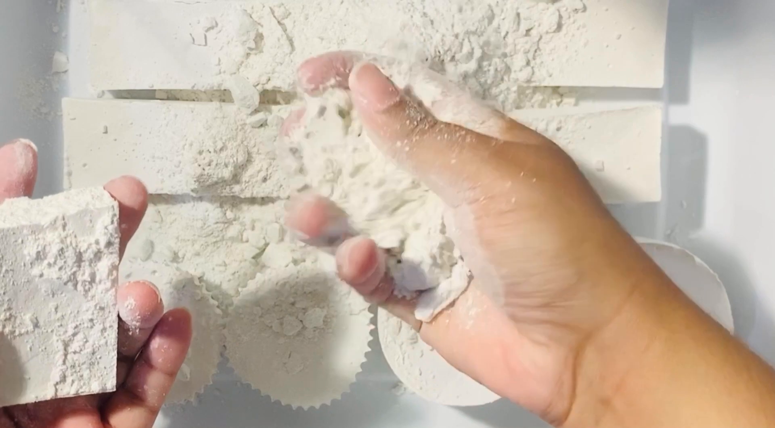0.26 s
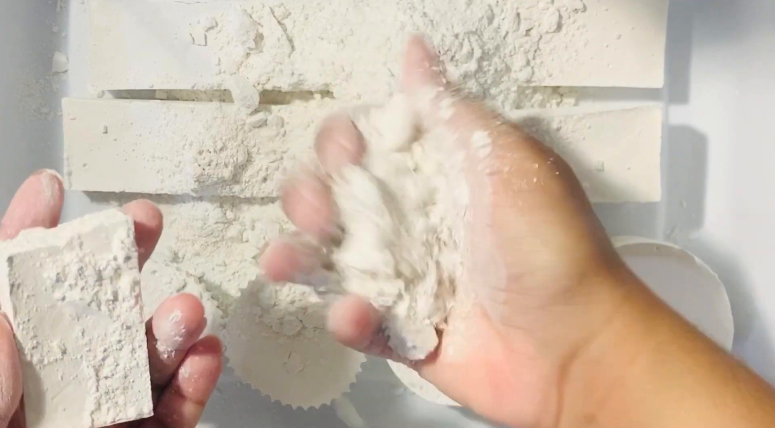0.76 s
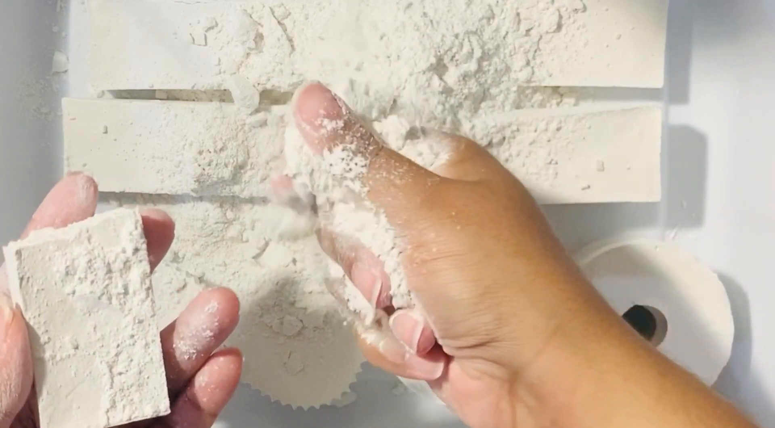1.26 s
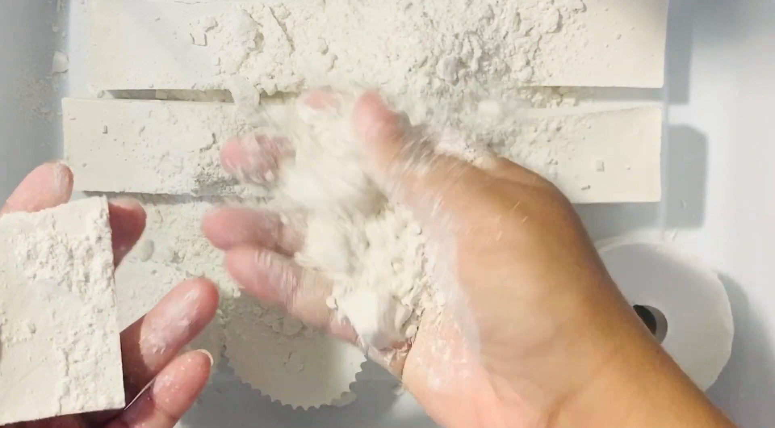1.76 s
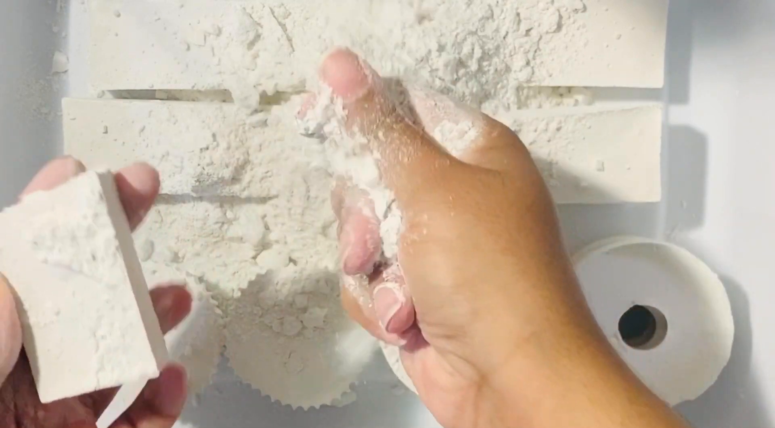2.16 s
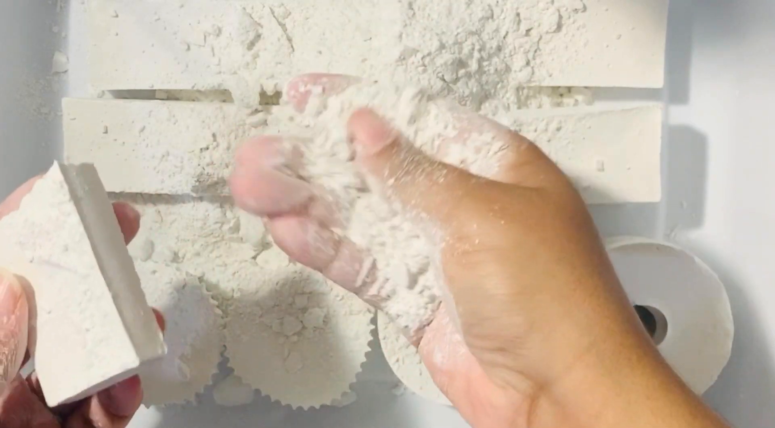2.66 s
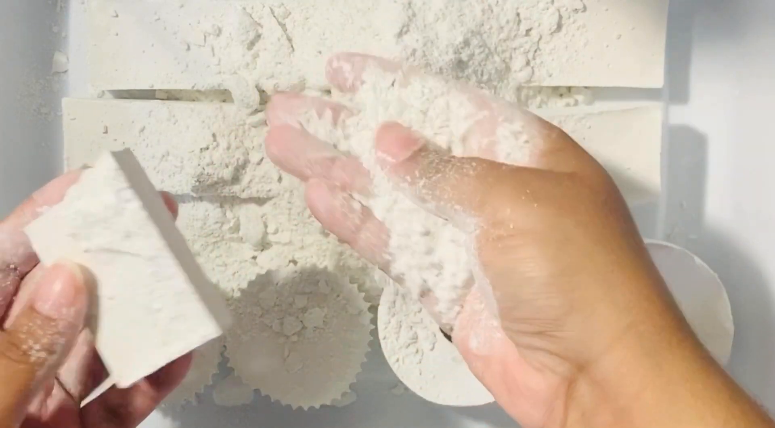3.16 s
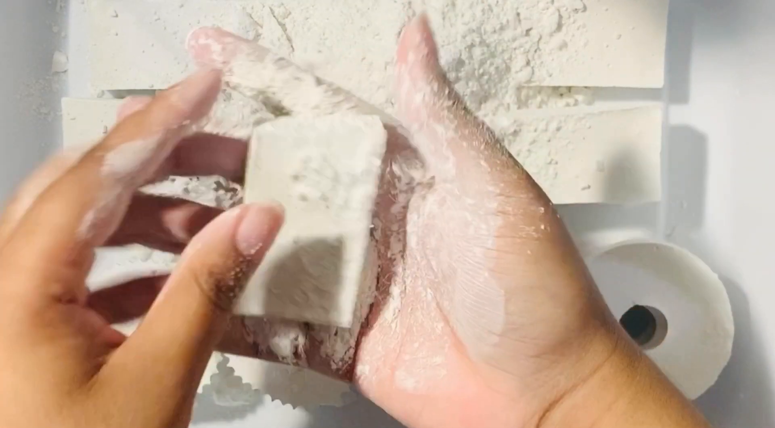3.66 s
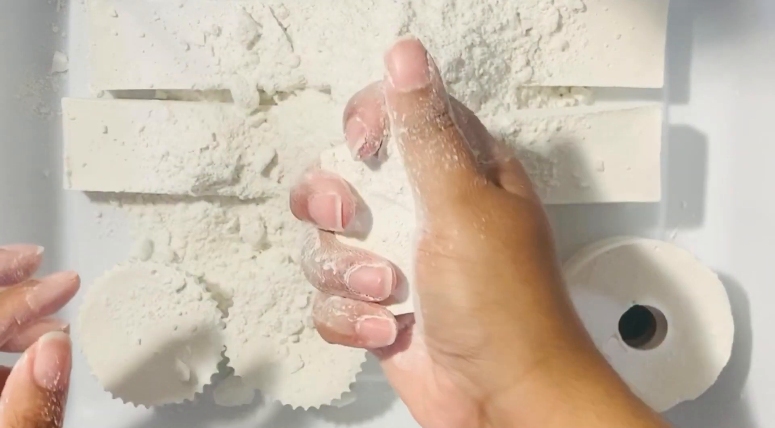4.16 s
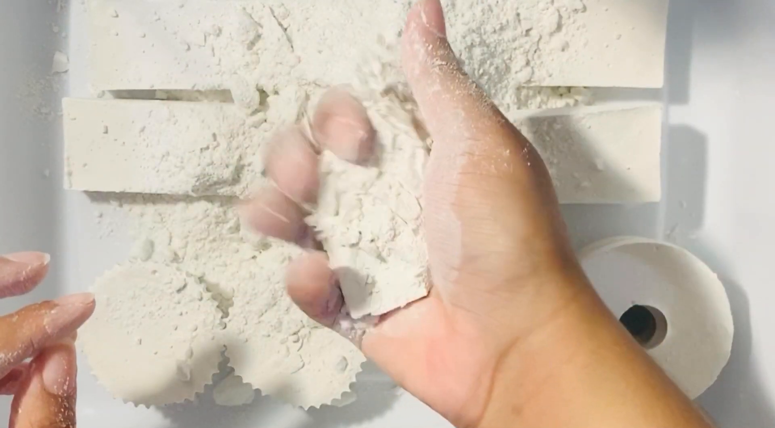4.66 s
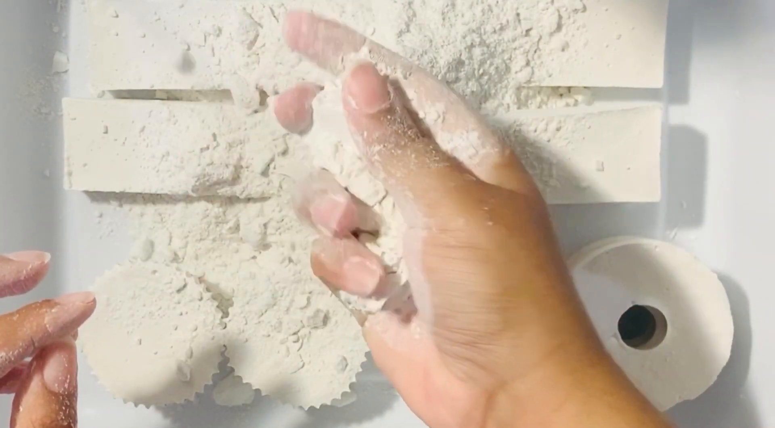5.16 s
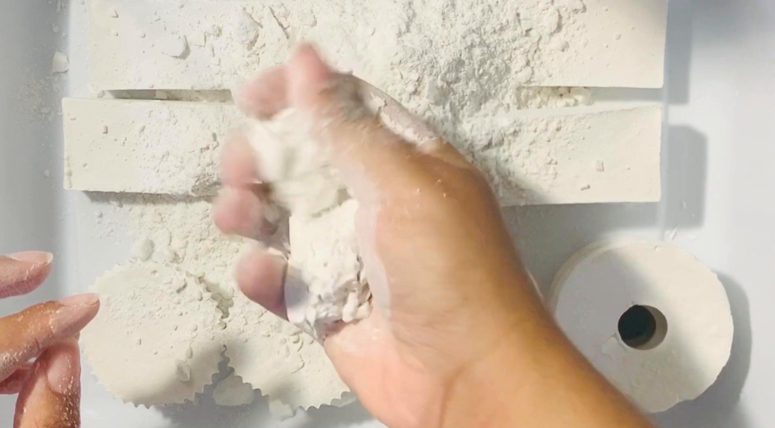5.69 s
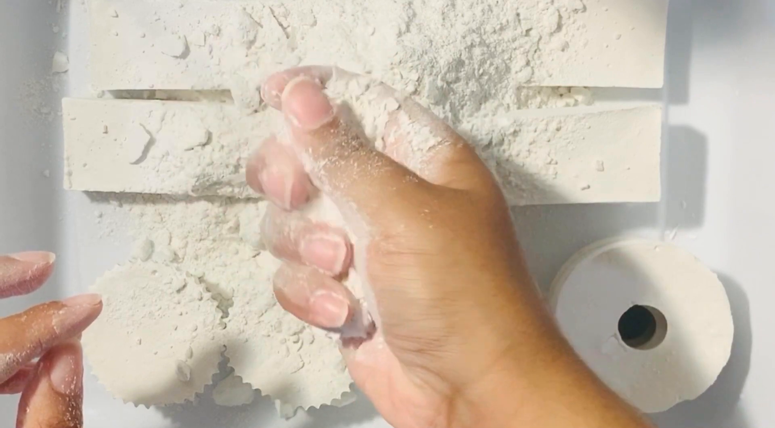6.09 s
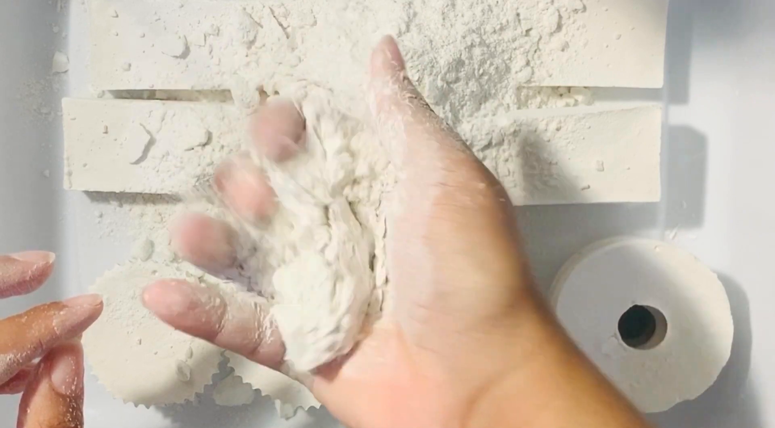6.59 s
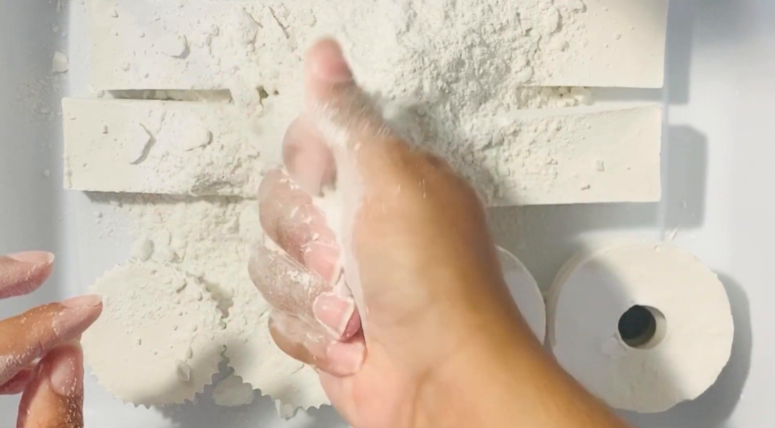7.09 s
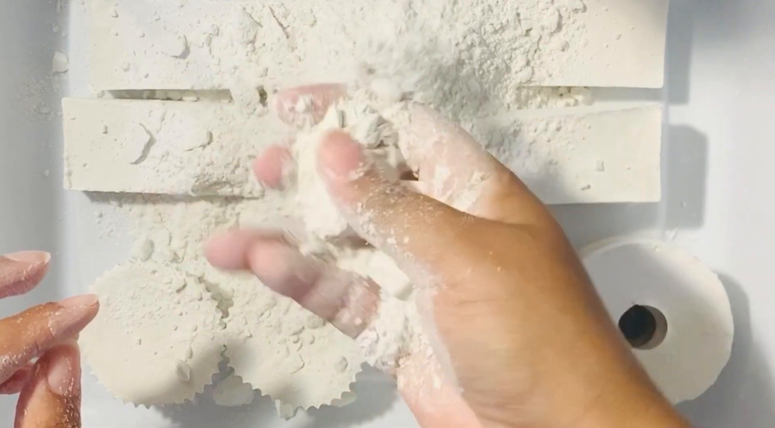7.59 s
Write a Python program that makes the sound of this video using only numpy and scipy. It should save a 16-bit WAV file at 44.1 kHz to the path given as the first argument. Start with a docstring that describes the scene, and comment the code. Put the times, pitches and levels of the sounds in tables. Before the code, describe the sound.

Very close to the microphone in a small quiet room, a fist squeezes soft chalk. High powdery hiss swells with each finger stroke over gritty grinding and small dry snaps. Falling lumps clack on a tray early on, with a heavier cluster just after two seconds. A fresh block then gives way with a short low thump, followed by softer crunching, one late sharp knock and more rustle, over faint rumble and hum.

```python
"""First a soft hiss of powder between the fingers, over a low rumble and a faint mains hum. A hand
crushes soft chalk over a tray, close to the microphone, in a small quiet room. The hiss, grinding crumbs
and dull bumps are noise that swells; the hum and one thump are sine waves. Snaps are bursts of noise, and
knocks are fading tones with a crushing burst. Both have set strengths in five bands and a faint echo."""
import sys
import numpy as np
from scipy import signal
from scipy.fft import rfft, irfft, next_fast_len
from scipy.io import wavfile
from scipy.ndimage import map_coordinates

SR = 44100
rng = np.random.default_rng(int(sys.argv[2]) if len(sys.argv) > 2 else 0)


def int16_out(signal):
    """Quantize to a 16-bit WAV file."""
    q = np.round(np.clip(np.atleast_2d(signal).T, -1, 1) * 32767)
    wavfile.write(sys.argv[1], SR, q.astype(np.int16))


N = 345744  # length of the scene in samples
HIT_TIME = np.arange(4096) / SR  # clock of one short hit, in seconds


def amp(db):
    """Turn decibels into a gain."""
    return 10 ** (np.asarray(db) / 20)


def unit(x):
    """Scale a sound to rms 1."""
    return x / np.sqrt(np.mean(x ** 2) + 1e-20)


def along(points, hz):
    """Read a curve of (frequency, value) points on a log frequency axis."""
    f, v = np.transpose(points)
    return np.interp(np.log(hz + 1), np.log(f + 1), v)


def wobble(rate):
    """Draw a smooth random curve with this many random points a second."""
    points = rng.standard_normal(int(N * rate / SR) + 4)
    return map_coordinates(points, [np.arange(N) * rate / SR])


def filtered(x, response):
    """Multiply the spectrum of x by a response that depends on frequency."""
    size = next_fast_len(N + SR // 2)
    hz = np.fft.rfftfreq(size, 1 / SR)
    return irfft(rfft(x, size) * response(hz), size)[:N]


def coloured(x, spectrum):
    """Give x a spectrum, at rms 1."""
    return unit(filtered(x, lambda hz: amp(along(spectrum, hz))))


def fade(t60):
    """Die away over one hit, falling 60 dB in t60 seconds."""
    return np.exp(-np.log(1000) * HIT_TIME / max(t60, 1e-3))


def rise(seconds):
    """Build up the contact over a short time."""
    return 1 - np.exp(-(HIT_TIME / seconds) ** 2)


def add(track, s, sound):
    """Mix a sound into a track at time s."""
    part = track[max(round(s * SR), 0):][:len(sound)]
    part += sound[:len(part)]


def swells(gestures, rest_db=-120):
    """Let each gesture grow and shrink in a bell; their powers add over a resting level."""
    t = np.arange(N) / SR
    coarse = t[::32]  # slow curves need few points
    bells = (amp(db) ** 2 * np.exp(-(2 * (coarse - s) / seconds) ** 2) for s, db, seconds in gestures)
    power = sum(bells)
    return np.interp(t, coarse, np.sqrt(power + amp(rest_db) ** 2))


def burst(spectrum, envelope):
    """Make a short rush of coloured noise under an envelope."""
    hz = np.fft.rfftfreq(len(HIT_TIME), 1 / SR)
    noise = rfft(rng.standard_normal(len(HIT_TIME)))
    return unit(irfft(noise * amp(along(spectrum, hz)))) * envelope


def grains(rate, spread_db, life):
    """Scatter tiny noisy cracks at random times, rate a second, of very unequal size."""
    starts = rng.random(N) < rate / SR
    sizes = starts * amp(spread_db * np.clip(rng.standard_normal(N), -2, 2))
    power = np.abs(signal.fftconvolve(sizes ** 2, fade(life) ** 2)[:N])
    return unit(np.sqrt(power) * rng.standard_normal(N))


def band_levels(colour, level_db, bright_db, thud_db):
    """List a hit's five band levels: hardness tilts the upper four, and the thud lies below."""
    offset_db, share = np.transpose(colour)
    return np.r_[thud_db, level_db + offset_db + share * bright_db]


# the thud, body, clack, edge and dust bands of a hit: (from [Hz], to [Hz])
HIT_BANDS = [(80, 450), (450, 1100), (1100, 2200), (2200, 4500), (4500, 16000)]
# a point inside each of these bands: frequency [Hz]
BAND_CENTRES = [260, 780, 1520, 3100, 8000]


def voiced(hit, levels_db, count=3):
    """Set a hit's band strengths by a smooth causal colour: hard contacts are bright, soft ones dull."""
    size = len(HIT_TIME)
    hz, z = np.fft.rfftfreq(size, 1 / SR), rfft(hit)
    for _ in range(count):  # each pass comes closer to the wanted levels
        energy = [np.sum(abs(z[(hz >= lo) & (hz < hi)]) ** 2) for lo, hi in HIT_BANDS]
        rms = np.sqrt(np.array(energy) * 2 / size / (SR * .01))  # as if spread over 10 ms
        cepstrum = irfft(along(np.c_[BAND_CENTRES, np.log(amp(levels_db) / rms)], hz))
        # folding the cepstrum forward in time keeps sound from leaking ahead of the hit
        cepstrum[1:size // 2] *= 2
        cepstrum[size // 2 + 1:] = 0
        z = z * np.exp(rfft(cepstrum))
    return irfft(z)


# colour of the room rumble and microphone hiss: (frequency [Hz], relative level [dB per Hz])
AIR_SPECTRUM = [(20, -1), (45, -1), (90, -12.5), (200, -15.5), (500, -26), (1200, -21.5), (4000, -23.5),
                (16000, -35)]


def background(air_db=-62, hum_db=-61, early_hum_db=-12, waver_db=2, drift=0.81):
    """Add room rumble, microphone hiss and a wavering mains hum that grows after the first seconds."""
    t = np.arange(N) / SR
    growth_db = np.interp(t, [1.7, 2.6], [early_hum_db, 0])
    level = amp(hum_db + growth_db + waver_db * wobble(12))
    phase = 2 * np.pi * 120 * t  # a 120 Hz hum
    hum = np.sqrt(2) * level * np.sin(phase + drift * wobble(40))
    return hum + amp(air_db) * coloured(rng.standard_normal(N), AIR_SPECTRUM)


# low rumble of the moving hand: (time [s], level before flesh_db [dB])
HAND_RUMBLE = [(0, -58.5), (1.9, -61), (3.6, -58), (7.84, -60)]
# squeezes of the fist that grind the crumbs: (time of the height [s], relative grit level [dB], duration [s])
SQUEEZES = [(.34, -57, .11), (.5, -61, .14), (1.03, -60, .16), (1.36, -60.5, .16), (1.99, -56, .15),
            (2.75, -59, .2), (3.7, -59, .09), (3.99, -60, .07), (4.33, -61, .12), (5.01, -59, .17),
            (5.42, -58, .12), (6.02, -56.5, .06), (6.27, -59.5, .08), (6.75, -57, .12), (7.03, -59.5, .17),
            (7.72, -60, .18)]
# strokes of the fingers over fine powder: (time of the height [s], hiss level [dB], duration [s])
STROKES = [(.01, -55.5, 0.059), (.14, -64, .08), (.47, -58.5, 0.13), (.62, -53.5, 0.083), (.76, -58, 0.057),
           (1.27, -57, 0.034), (1.51, -59.5, 0.088), (1.63, -56, 0.032), (1.97, -60, 0.12),
           (2.22, -56.5, 0.13), (2.44, -56.5, 0.12), (2.68, -57.5, 0.075), (2.82, -56, 0.093),
           (3.06, -54, .09), (3.32, -54.5, 0.11), (3.59, -53, 0.08), (3.81, -57.5, 0.099),
           (4.0, -62.5, .07), (4.42, -65.5, 0.28), (4.59, -60, 0.04), (4.85, -62, 0.14), (5.17, -55, 0.073),
           (5.4, -54.5, .11), (5.63, -56, 0.081), (5.87, -57, 0.063), (6.02, -56.5, .06),
           (6.27, -55.5, 0.17), (6.44, -50.5, 0.052), (7.03, -53, 0.17), (7.59, -64.5, 0.042),
           (7.79, -61.5, .11)]
# the fingers never quite rest: hiss and relative grit level between the gestures [dB]
REST_HISS_DB, REST_GRIT_DB = -65.5, -64.5
# colour of the rumbling flesh: (frequency [Hz], relative level [dB per Hz])
FLESH_SPECTRUM = [(30, -4.5), (60, 1.5), (90, -0.5), (160, -10.5), (250, -7), (450, -20.5), (900, -28.5)]
# colour of the grinding crumbs: (frequency [Hz], relative level [dB per Hz])
CRUMB_SPECTRUM = [(200, -11.5), (420, 4), (600, 6), (740, -4.5), (900, 4), (1100, -8.5), (1400, 0),
                  (1800, -11), (2500, -5.5), (3500, -11.5), (5000, -13), (8000, -16), (16000, -23.5)]
# colour of the sliding powder: (frequency [Hz], relative level [dB per Hz])
POWDER_SPECTRUM = [(3820, -47), (6500, -9), (7460, -11.5), (8060, -4.5), (9390, 0.5), (11000, -1.5),
                   (12000, 1), (14900, 2), (15800, -8)]


def kneading(flesh_db=-1, crumb_db=-3, smear_db=-4, powder_db=0, sparkle_db=-9):
    """Rub the lump: flesh rumbles, crumbs grind, and fine powder slides with a high hiss."""
    rub = amp(np.interp(np.arange(N) / SR, *np.transpose(HAND_RUMBLE)))
    grind = swells(SQUEEZES, REST_GRIT_DB)
    slide = swells(STROKES, REST_HISS_DB)
    uneven_db = 1.8 * wobble(20)
    flesh = coloured(rng.standard_normal(N), FLESH_SPECTRUM) * amp(flesh_db + uneven_db)
    crumbs = amp(crumb_db) * coloured(grains(rate=140, spread_db=4.0, life=0.003), CRUMB_SPECTRUM)
    smear = amp(smear_db) * coloured(rng.standard_normal(N), CRUMB_SPECTRUM)
    sparkle = amp(sparkle_db) * grains(rate=380, spread_db=7, life=.002)
    dust = rng.standard_normal(N) + sparkle
    powder = coloured(dust, POWDER_SPECTRUM) * amp(powder_db + 1.7 * wobble(41))
    return rub * flesh + grind * (crumbs + smear) + slide * powder


# the block slides into the dusty palm in two pushes: (time of the height [s], level [dB], duration [s])
SKIDS = [(3.58, -64, 0.035), (3.82, -61, 0.064)]


def skid(centre_hz=9600, width_hz=700):
    """Rustle faintly, like a sliding block, in a narrow band of noise with an unsteady level."""
    band = lambda hz: 1 / (1 + (2 * (hz - centre_hz) / width_hz) ** 2)
    hiss = unit(filtered(rng.standard_normal(N), band))
    return hiss * swells(SKIDS) * amp(2 * wobble(60))


# fingers bumping and clenching: (time of the height [s], level [dB], duration [s])
BUMPS = [(.19, -55.5, 0.015), (.297, -53, .019), (.634, -44.5, 0.026), (.725, -50, 0.046),
         (.86, -56.5, 0.055), (1.38, -52, .085), (2.134, -39, 0.041), (2.21, -45.5, 0.035),
         (2.307, -39, .059), (2.345, -45.5, 0.051), (6.012, -74, 0.026)]


def bumps(level_db=0):
    """Swell dully with no sharp edge, as soft flesh does."""
    # (frequency [Hz], relative level [dB per Hz])
    dull = [(40, -20.5), (80, 4.5), (130, 1), (200, -6.0), (350, -10), (700, -41.0)]
    return amp(level_db) * swells(BUMPS) * coloured(rng.standard_normal(N), dull)


def thump(s=4.2572, level_db=-19, hz=118, t60=0.031, attack=0.0015):
    """Thump once on a short low tone: the fresh block gives way and the closing fist lands on it."""
    out = np.zeros(N)
    tone = np.sin(2 * np.pi * hz * HIT_TIME)
    add(out, s, amp(level_db) * tone * fade(t60) * rise(attack))
    return out


# hard lumps and shards that ring briefly: (time [s], pitch [Hz], level before shaping [dB], t60 [s])
CHINKS = [(.631, 1970, -41.5, 0.048), (.631, 2910, -45.5, 0.054), (.686, 4020, -62, .04),
          (0.7583, 1360, -14, 0.02), (.7575, 1894, -15, 0.037), (0.7555, 4550, -22.5, 0.013),
          (2.108, 1940, -36, 0.098), (2.109, 2910, -49, .045), (2.133, 4060, -32.5, 0.042),
          (2.2958, 2790, -24.5, 0.013), (3.7046, 1730, -21, 0.013), (3.7039, 2300, -25.5, .016),
          (3.7035, 567, -24.5, 0.023), (3.958, 4010, -46.5, 0.035), (5.496, 4040, -42.5, 0.034),
          (5.6094, 1330, -10, .014), (5.6071, 3410, -7, .012)]


def chinks():
    """Ring dense shards: each row is one bending mode, a sine that fades quickly."""
    out = np.zeros(N)
    for s, hz, db, t60 in CHINKS:
        add(out, s, amp(db) * np.sin(2 * np.pi * hz * HIT_TIME) * fade(t60) * rise(0.00051))
    return out


def crumblings(level_db=-65.5, spread_db=1.4, bright_db=-3, bright_spread_db=5,
               thud_over_level_db=2, t60=.016, count=28):
    """Let small crumbs give way at random, most often while the fist squeezes; rows as in SNAPS."""
    work = np.cumsum(swells(SQUEEZES, REST_GRIT_DB) ** 2)
    chance = rng.standard_normal((count, 2))
    shares = (np.arange(count) + rng.random(count)) / count  # one crumb for each equal share of the work
    times = np.searchsorted(work / work[-1], shares) / SR
    levels = level_db + spread_db * chance[:, 0]
    brights = bright_db + bright_spread_db * chance[:, 1]
    return [(s, db, bright, db + thud_over_level_db, t60) for s, db, bright in zip(times, levels, brights)]


# breaks in the hand: (time [s], level before the colour [dB], brightness before its share [dB],
# thud level [dB], t60 of the fracture [s])
SNAPS = [(0.2544, -62, 2, -64, .019), (.3546, -66, -17, -60, 0.023), (0.377, -69, -21, -55, .025),
         (0.2857, -57.5, -1, -48, 0.062), (.3123, -60.5, -16, -44, 0.047), (0.41, -55, 6, -48.5, .008),
         (.5073, -59.5, 2, -62, .013), (1.2725, -61.5, -6, -51, .028), (1.3424, -55, -4.5, -55, 0.043),
         (1.363, -54, -13.5, -49, .044), (1.3765, -61, -7, -56, 0.034), (1.4026, -52, 0.5, -54, 0.037),
         (1.549, -71, 15.5, -76, .01), (1.863, -65, 6, -59, .031), (1.9252, -54.5, 4, -64, 0.055),
         (1.9618, -55, 3, -56, 0.039), (1.9757, -43, -5.5, -60, 0.0099), (1.9806, -46.5, -12, -47.5, 0.023),
         (2.0051, -44, 3, -51, 0.019), (2.1563, -47.5, 6.5, -50, 0.0081), (2.1765, -51, 3, -59, 0.0079),
         (2.2142, -47.5, -3.5, -61, 0.038), (2.294, -43.5, 6.5, -52.5, .016), (2.373, -63, 1.5, -62, .018),
         (3.4812, -49.5, -3.5, -52, 0.043), (3.4999, -54.5, -6.5, -63, 0.017), (3.6421, -60, 10, -60, .014),
         (3.7166, -53.5, -1.5, -56, 0.051), (3.7666, -62, 14.5, -69, .01), (3.7782, -68, 19.5, -66, 0.0054),
         (4.0237, -55.5, 10, -69, 0.016), (4.2586, -46, 6.5, -40.5, .025), (4.4012, -53.5, 1, -60.5, 0.057),
         (4.951, -62.5, -1.5, -55, .015), (4.99, -63, 5, -54, .016), (5.0767, -50.5, -6.5, -52, 0.032),
         (5.1153, -61, -2.5, -69, .04), (5.4191, -55.5, 7, -52, 0.03), (5.8082, -53, 6.5, -57, .014),
         (5.8149, -46.5, 3.5, -61, 0.03), (5.97, -47.5, 5.5, -46, 0.022), (6.0058, -47.5, 2.5, -44, 0.044),
         (6.05, -54.5, -2, -65, 0.015), (6.2659, -53.5, -4, -49, 0.021), (6.292, -45, -1.5, -56.5, 0.012),
         (6.7292, -50.5, -4.5, -49, 0.022), (6.9468, -58.5, 3.5, -67, .04), (7.007, -57, 1, -56, .05),
         (7.0866, -61, 2, -58, .019), (7.7082, -49, -8, -47.5, 0.028)]
# a snap's body, clack, edge and dust bands: (offset from its level [dB], share of its brightness [ratio])
SNAP_COLOUR = [(1, -0.34), (0, -0.21), (-1, 0.6), (-4.5, 1)]


def snaps(spike_db=5, fist_db=-5, fist_t60=0.026, thud_db=-8, thud_t60=0.032, thud_hz=135):
    """Break chalk in a quick run of tiny cracks; the hollow of the fist rings on and the flesh thuds."""
    out = np.zeros(N)
    # colours of the crack and the fist: (frequency [Hz], relative level [dB per Hz])
    crack = [(100, -21.5), (300, -1.5), (600, 5.5), (3300, -7.0), (5500, -11.5), (9000, -6.0),
             (16000, -11.5)]
    fist = [(100, -27), (280, -10), (550, 16.5), (950, -0.5), (1100, -8.0), (1500, -7), (3000, -6.5),
            (5000, -24.5)]
    for s, *blow, t60 in list(SNAPS) + crumblings():
        sizes = amp(spike_db * rng.standard_normal(len(HIT_TIME) // 16))
        cracks = unit(np.repeat(sizes, 16))  # a new size every 16 samples
        hit = burst(crack, cracks * fade(t60) * rise(0.000074))
        hit += amp(fist_db) * burst(fist, fade(fist_t60) * rise(.0004))
        thud = np.cos(2 * np.pi * thud_hz * HIT_TIME)
        hit += amp(thud_db) * thud * fade(thud_t60) * rise(0.0018)
        add(out, s, voiced(hit, band_levels(SNAP_COLOUR, *blow)))
    return out


# lumps landing on the tray, hard ones bright and powdery ones thudding:
# (time [s], level before the colour [dB], brightness before its share [dB], thud level [dB])
KNOCKS = [(0.619, -44.5, -22, -50), (0.6317, -45.5, -23, -51), (.686, -38, -34, -59),
          (0.7352, -26.5, -8.5, -47.5), (0.757, -23.5, -4.5, -52), (0.7694, -31, -6.5, -48),
          (1.0114, -46.5, -14, -47), (1.0704, -47, -17, -51), (1.7171, -57.5, -20, -60),
          (2.1089, -41, -16, -35), (2.1169, -37.5, -19, -41), (2.1328, -30, -19, -40),
          (2.186, -38, -29, -57), (2.2754, -32, -21.5, -35.5), (2.2798, -27, -41.5, -34),
          (2.295, -31.5, -15.5, -37.5), (2.3051, -28.5, -29.5, -43), (2.3105, -20.5, -22.5, -41),
          (2.3325, -11, -28.5, -47.5), (2.3568, -26, -29, -53), (2.3653, -38.5, -24.5, -57),
          (2.3893, -45, -25.5, -52), (2.4021, -29.5, -30, -51), (2.4113, -20.5, -18, -54.5),
          (2.4979, -41, -16, -60), (2.5141, -36, -28, -65), (2.6765, -52.5, -25, -62),
          (3.7025, -34.5, -5, -43.5), (3.7524, -47, -12, -61), (5.4954, -44.5, -17.5, -58.5),
          (5.6072, -15.5, -9.5, -48.5), (5.6242, -34.5, -18.5, -50)]
# a knock's body, clack, edge and dust bands: (offset from its level [dB], share of its brightness [ratio])
KNOCK_COLOUR = [(0, 0.026), (-0.5, 0.49), (1, 1), (-13, 1)]
# ringing modes of the loaded tray: (frequency [Hz], relative level before voicing [dB], t60 [s])
TRAY_MODES = [(177.2, -29, 0.029), (412, -22, 0.0082), (592, -9, .034), (695, -18.5, 0.034),
              (883, -1, 0.022), (1254, -4.5, 0.017), (1450, -17.5, 0.041), (1973, -13.5, .016),
              (2390, -15.5, .013), (2746, -4.5, 0.0098), (3100, -22, 0.0058)]
MODE_SCATTER_DB = 3  # how much each tray mode varies from lump to lump, before voicing


def knocks(crush_db=-7, crush_t60=0.014, attack=0.00043):
    """Land each lump: it crushes a little and rings the tray's damped modes at new strengths."""
    out = np.zeros(N)
    # colour of the crushing: (frequency [Hz], relative level [dB per Hz])
    crush = [(100, -19.0), (500, -12.0), (1000, -8.5), (1700, -5.5), (3500, 5.5), (4200, -9.5),
             (7000, -14), (10000, -15.5), (16000, -25.5)]
    contact = signal.windows.hann(9) / 4  # soft chalk spreads the blow over a fifth of a millisecond
    for s, *blow in KNOCKS:
        ring = np.zeros(len(HIT_TIME))
        for hz, db, t60 in TRAY_MODES:
            strength = amp(db + MODE_SCATTER_DB * rng.standard_normal())
            ring += strength * fade(t60) * np.cos(2 * np.pi * hz * HIT_TIME)
        hit = np.convolve(ring, contact)[:len(HIT_TIME)]
        hit += amp(crush_db) * burst(crush, fade(crush_t60)) * rise(attack)
        add(out, s, voiced(hit, band_levels(KNOCK_COLOUR, *blow)))
    return out


def radiated():
    """Send each listed knock or snap to the walls, summed over all directions, as a smooth click."""
    out = np.zeros(N)
    for hits, colour in (KNOCKS, KNOCK_COLOUR), (SNAPS, SNAP_COLOUR):
        for s, level_db, bright_db, thud_db, *_ in hits:
            click = signal.unit_impulse(len(HIT_TIME))
            add(out, s, voiced(click, band_levels(colour, level_db, bright_db, thud_db)))
    return out


# the echo of the room: (frequency [Hz], t60 [s], relative strength [dB])
ROOM_DECAY = [(150, .25, -2.5), (455, .25, -0.5), (600, 0.23, 3), (743, 0.096, 0.5), (920, 0.36, -1),
              (1150, 0.2, -3.5), (1900, 0.32, -2), (3200, 0.28, -0.5), (4560, 0.22, 0), (14000, 0.29, -4)]


def room(x):
    """Answer from the walls after 7 ms with fading noise; each pitch dies at its own rate."""
    hz, t, z = signal.stft(rng.standard_normal(SR // 2), SR, nperseg=256)
    decay = np.array(ROOM_DECAY)
    t60 = along(decay[:, [0, 1]], hz)[:, None]
    db = along(decay[:, [0, 2]], hz)[:, None]
    fading = z * amp(db) * np.exp(-np.log(1000) * t / t60)
    tail = signal.istft(fading, SR, nperseg=256)[1]
    tail = np.pad(tail / np.linalg.norm(tail), (round(.007 * SR), 0))
    return signal.fftconvolve(x, tail)[:N]


def scene(knock_db=0, snap_db=0, room_db=-21, low_cut_hz=35):
    """Mix the close chalk sounds and a little room over the hand and the background."""
    close = amp(knock_db) * knocks() + amp(snap_db) * snaps() + chinks()
    # small objects radiate little bass
    close = filtered(close, lambda hz: (1j * hz / (1j * hz + low_cut_hz)) ** 2)
    hand = kneading() + bumps() + thump() + skid()
    echo = amp(room_db) * room(radiated())
    return (close + echo + hand + background())[None]


TOP_HZ = 15950  # upper band limit


def record(dry):
    """Keep nothing above the recorder's band limit."""
    return filtered(dry[0], lambda hz: hz < TOP_HZ)[None]


dry = scene()
out = record(dry)
int16_out(out)
```